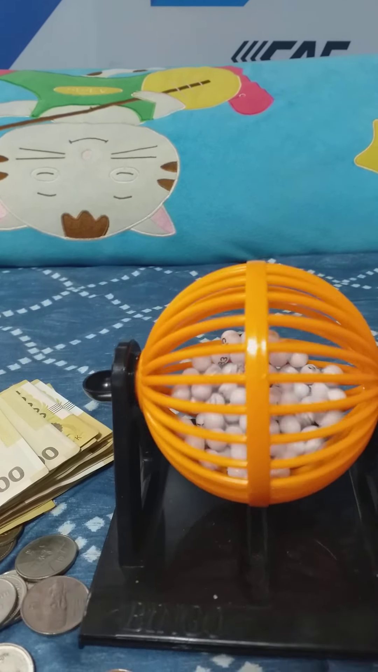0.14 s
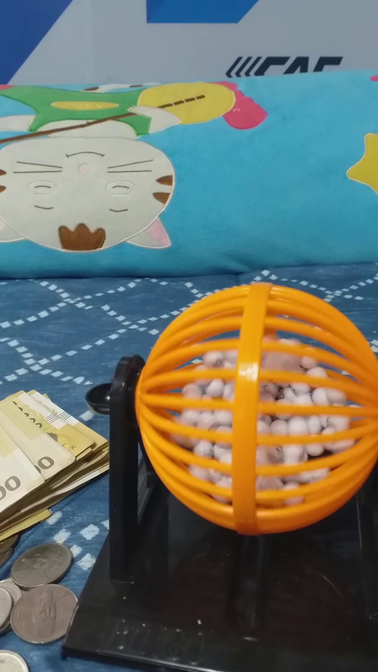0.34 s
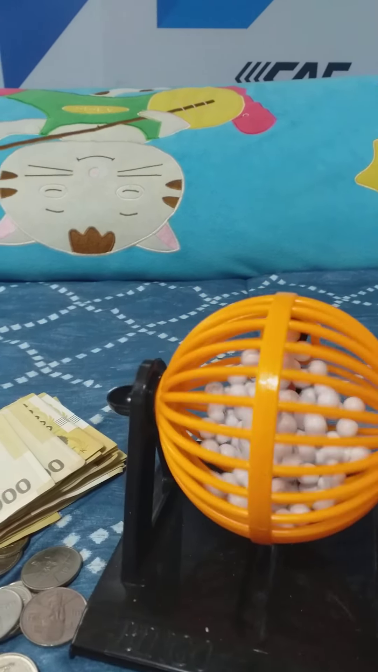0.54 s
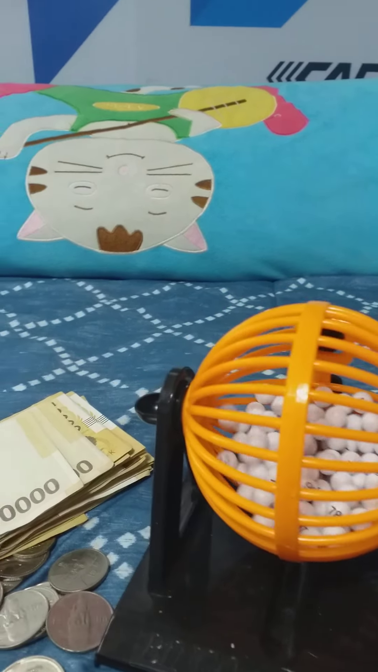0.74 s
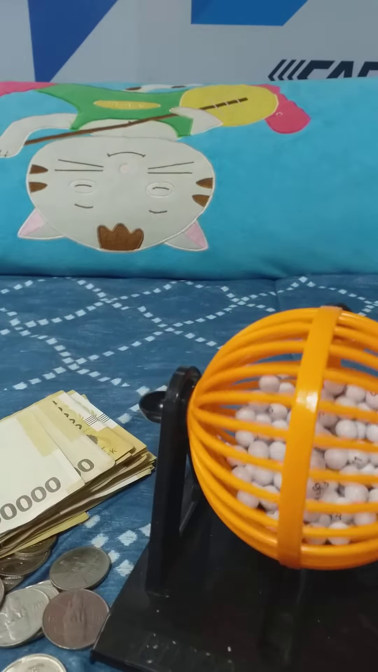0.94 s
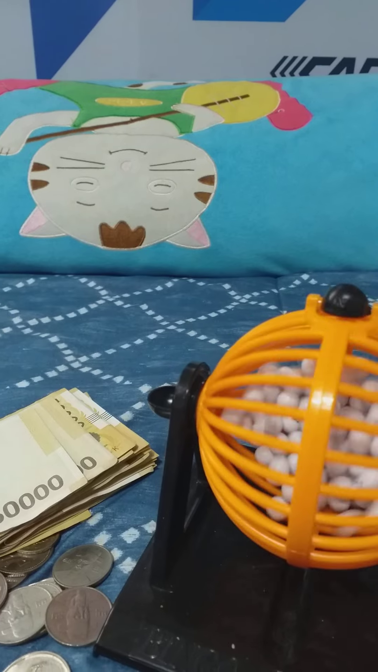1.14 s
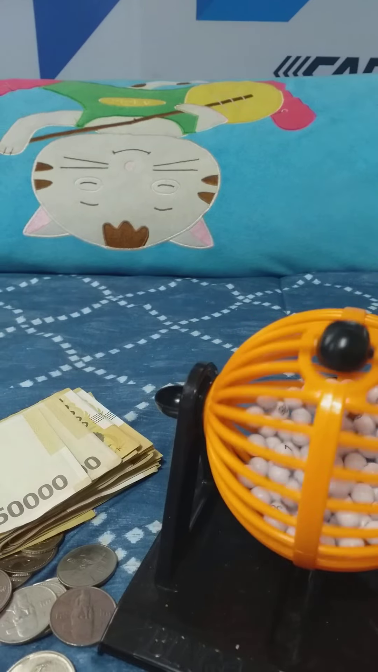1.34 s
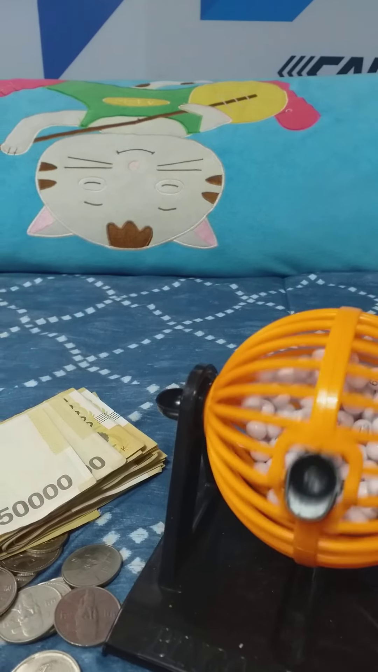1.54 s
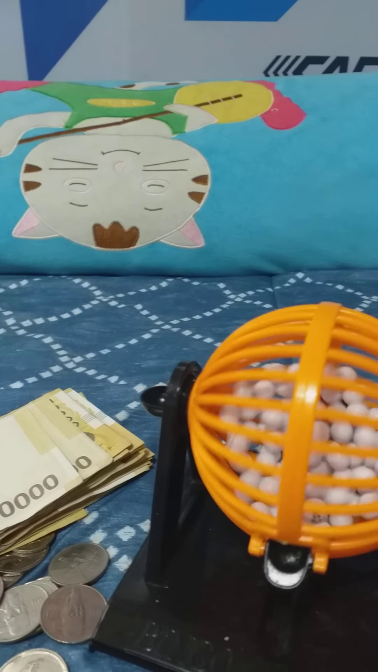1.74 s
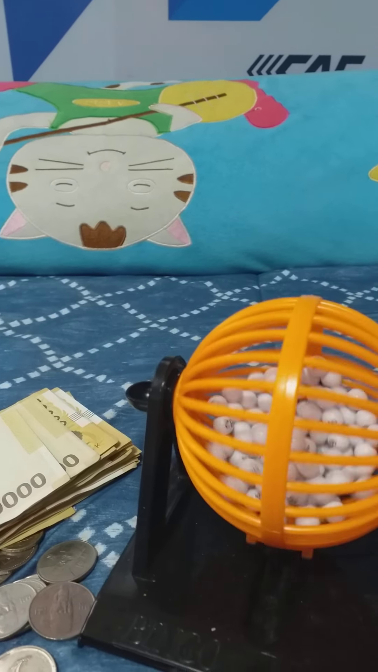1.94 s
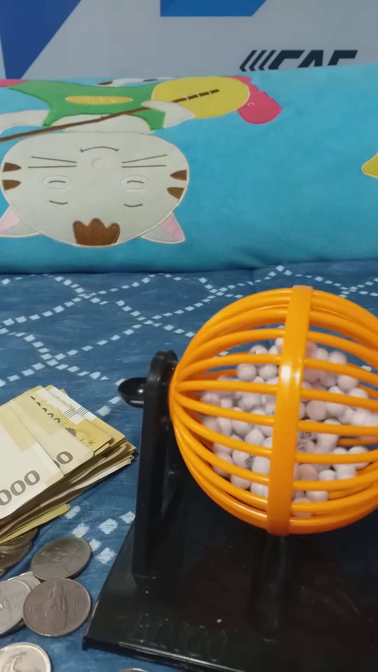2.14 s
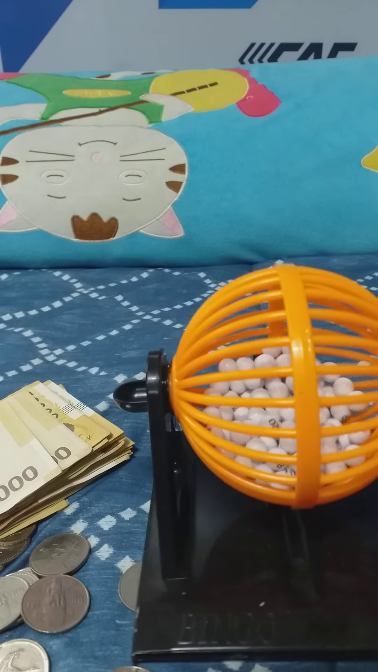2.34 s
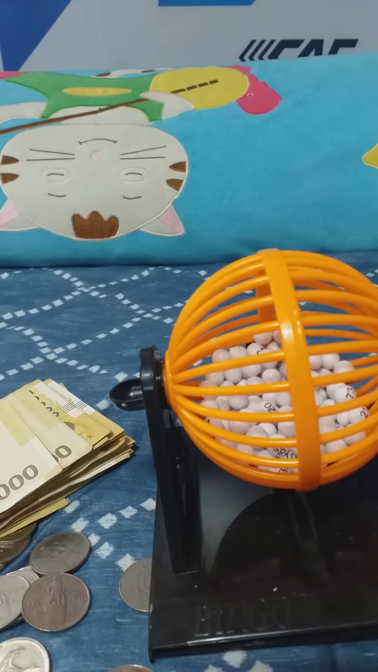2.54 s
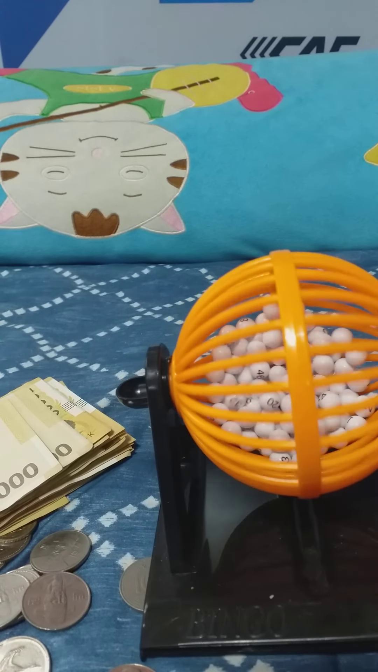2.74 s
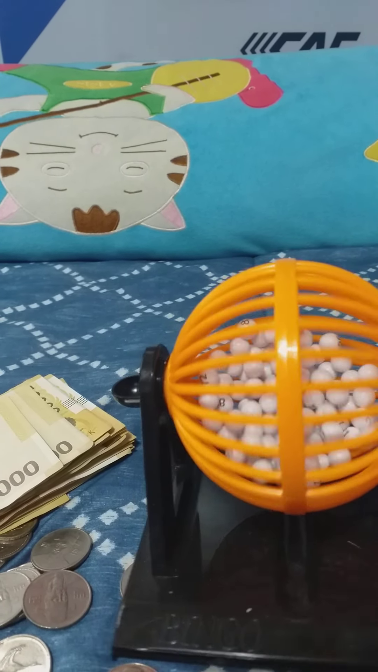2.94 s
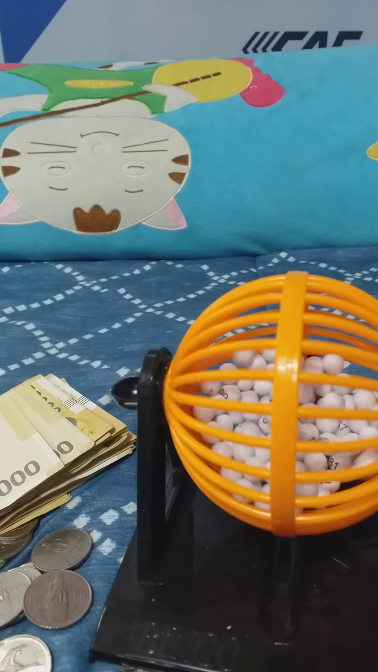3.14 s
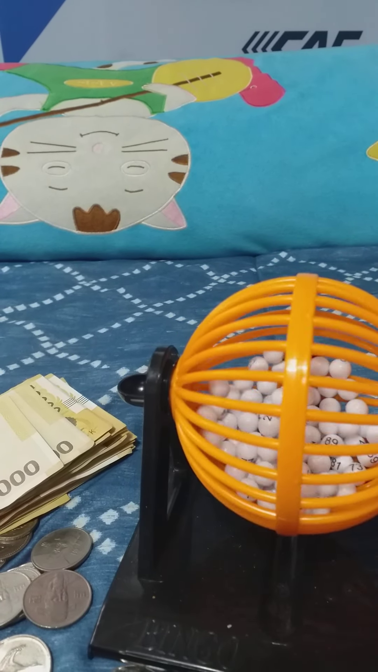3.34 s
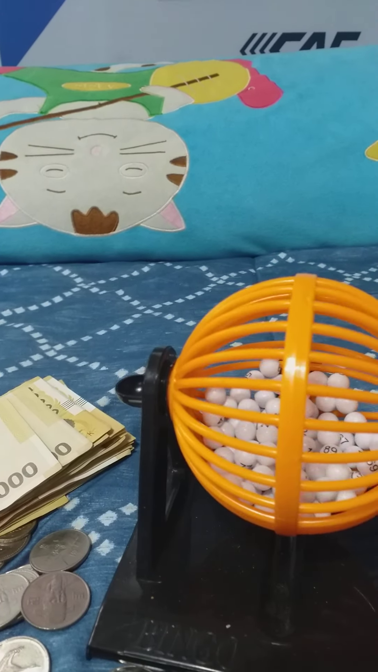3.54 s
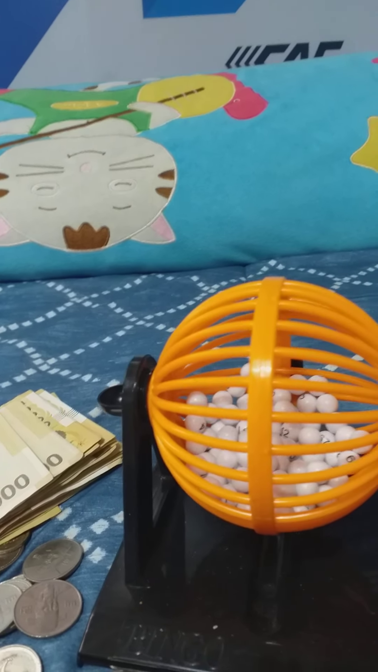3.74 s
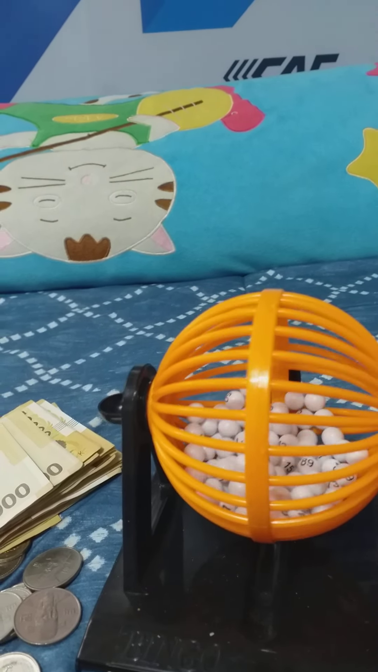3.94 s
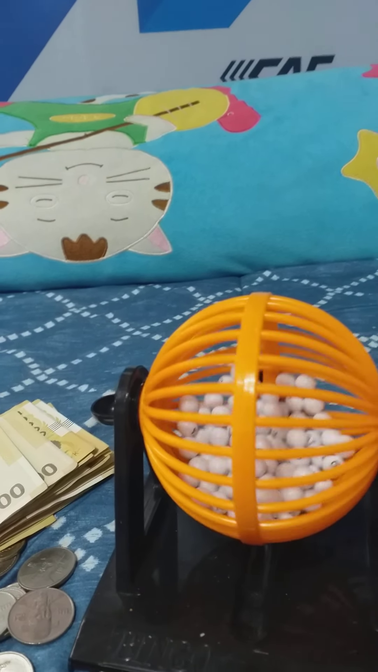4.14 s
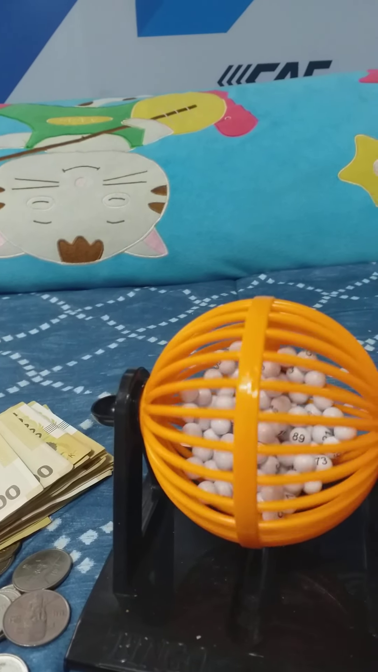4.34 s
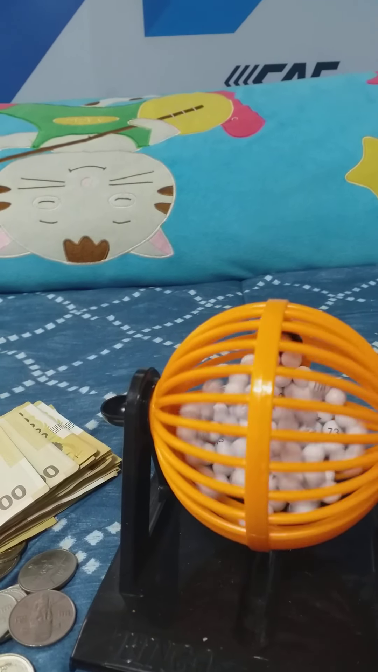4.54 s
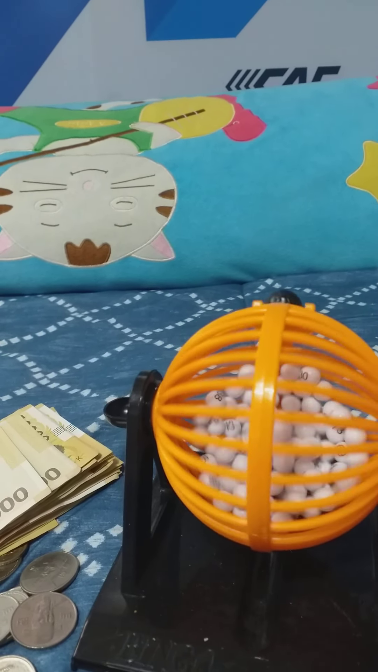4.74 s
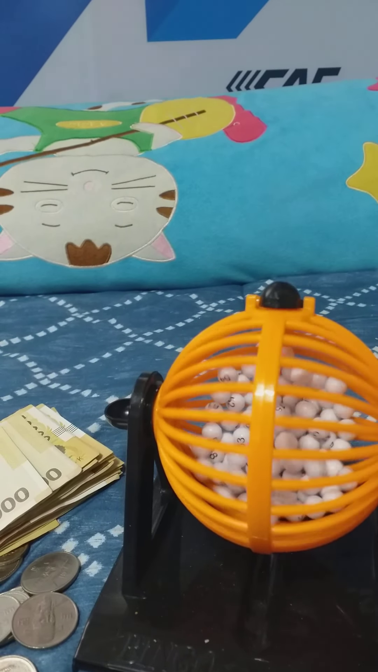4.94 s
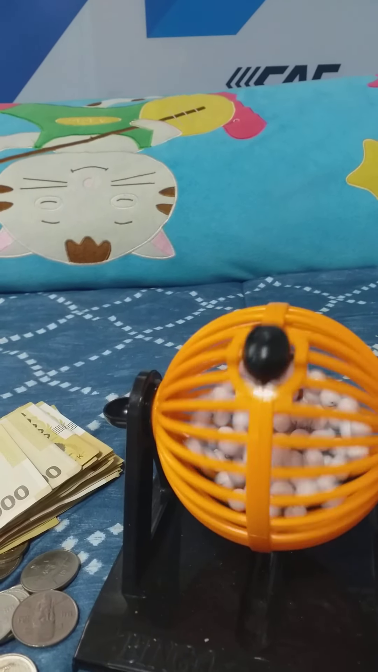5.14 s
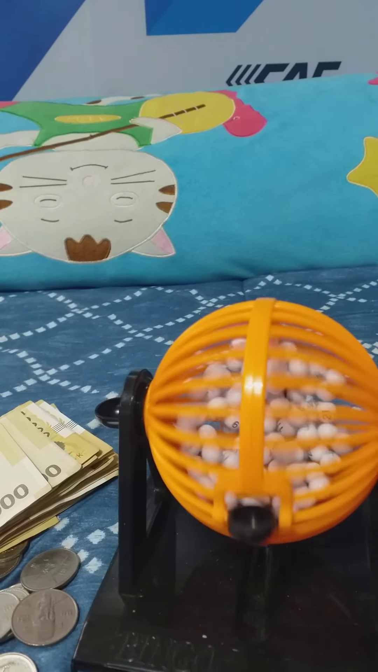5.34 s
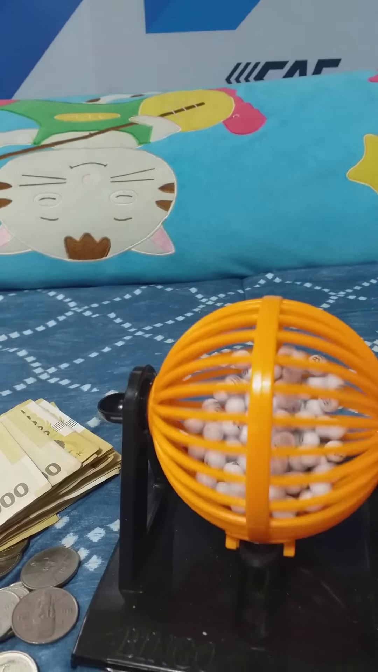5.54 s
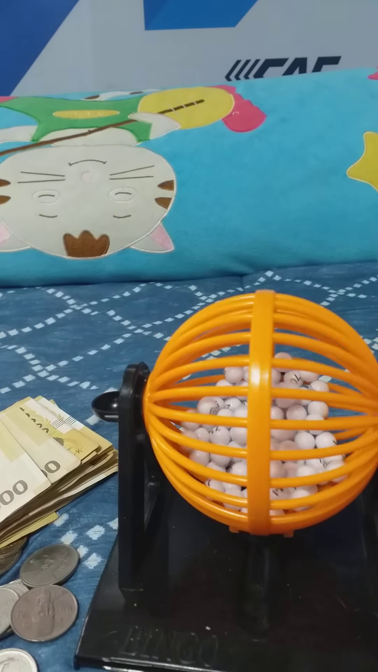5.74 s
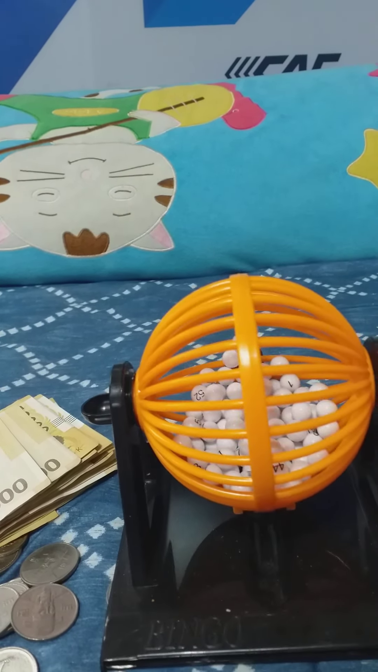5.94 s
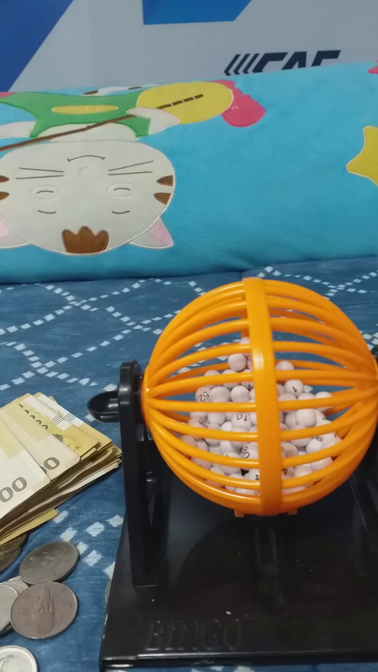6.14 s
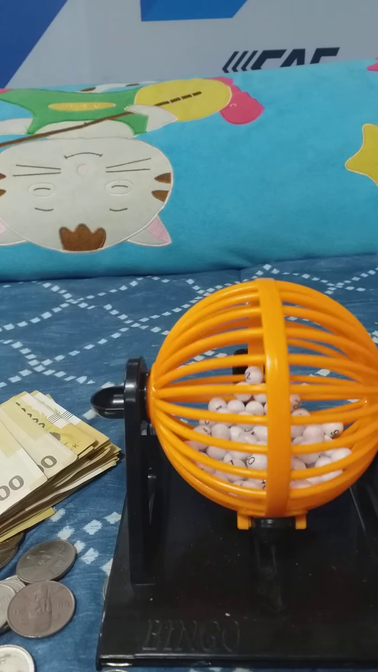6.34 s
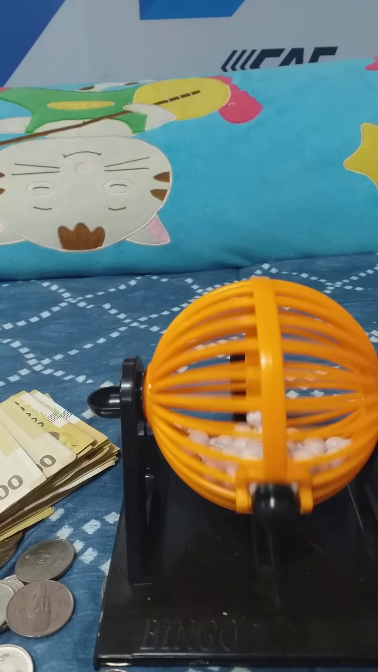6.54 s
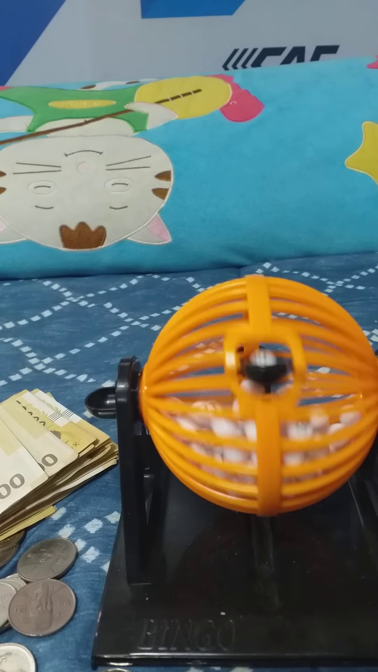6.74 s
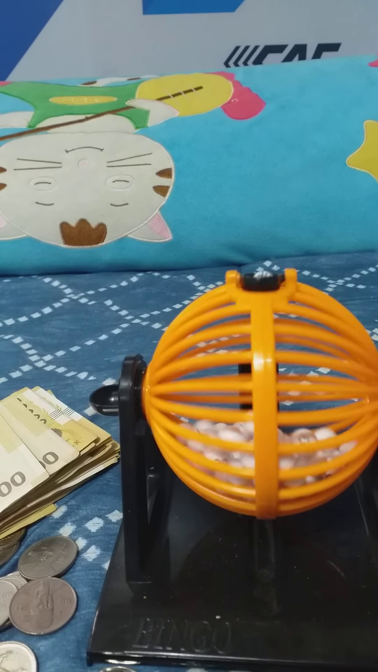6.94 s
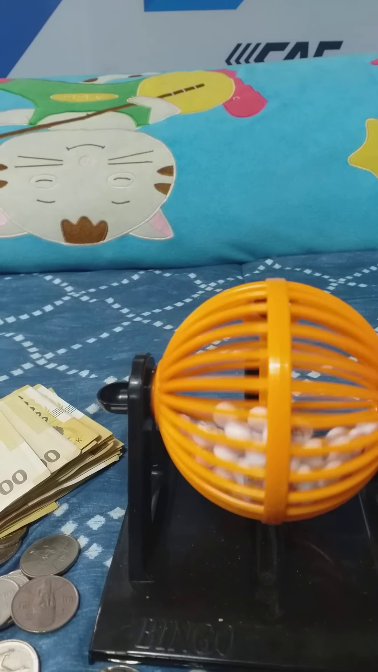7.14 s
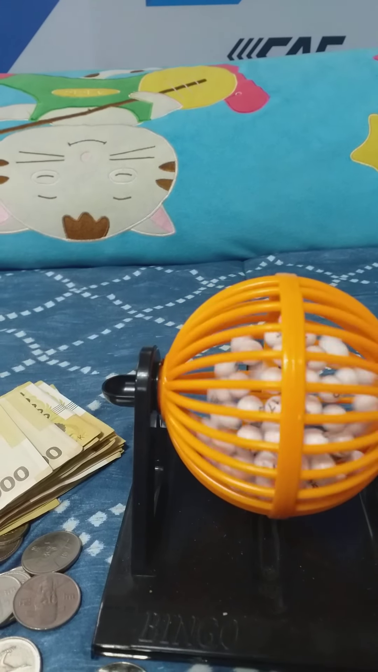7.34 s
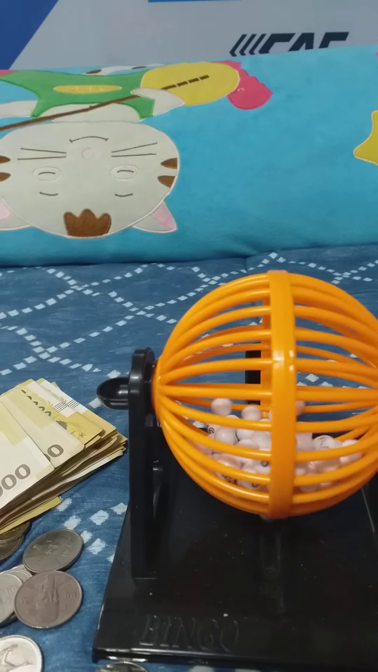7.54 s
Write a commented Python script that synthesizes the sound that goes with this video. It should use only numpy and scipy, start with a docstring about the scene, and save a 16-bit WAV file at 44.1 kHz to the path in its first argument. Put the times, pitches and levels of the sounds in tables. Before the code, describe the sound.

A small plastic cage full of little balls is cranked in fits, giving crisp dense clatter, stray clacks and short settling ticks over faint room hum.

```python
"""A quiet room: on a bed, close to the microphone, a toy bingo cage of small plastic balls is cranked in bursts.
The heap catches and slips; every collision is a noise crack with ringing ball modes, filtered by the cage ribs.
Single balls drop clear of the heap, also as the cage stops. The axle rubs and the frame bumps once.
A short dull room tail follows; shaped noise and sines make the room air and a faint hum."""
import sys
import numpy as np
from scipy import signal
from scipy.fft import rfft, irfft
from scipy.io import wavfile
from scipy.ndimage import uniform_filter1d

SR = 44100
rng = np.random.default_rng(int(sys.argv[2]) if len(sys.argv) > 2 else 0)


def wav_record(signal):
    """Record a signal, one row per channel, as 16-bit PCM in the file named by sys.argv[1]."""
    frames = np.transpose(np.atleast_2d(signal))
    bounded = np.clip(frames, -1, 1)
    # unit amplitude maps onto the largest positive 16-bit level
    quanta = np.round(bounded * 32767).astype(np.int16)
    wavfile.write(sys.argv[1], SR, quanta)


N = 334187
TIME = np.arange(N) / SR

# Single balls heard apart from the heap, from hard clacks to faint settling ticks.
# Each row: time in seconds, level in dB before the drop trim,
# cage and contact tick in dB relative to the ball, before their trims.
SINGLE_BALLS = [(0.0429, -17, -18, -21), (0.0873, -21, -16, -8), (0.1223, -10.5, -13, -13),
                (0.2204, -19.5, -7, -5), (0.2673, -16, -9.5, -7), (0.2846, -15.5, -8.5, -5),
                (0.3388, -18, -10, -11), (0.364, -13, -12, -10), (0.384, -15, -16, -12),
                (0.7008, -29, -11, -3), (0.753, -28, -4, -6), (0.7796, -22.5, -6.5, -7),
                (0.8047, -25.5, -2, -0.5), (0.831, -24, -2.5, 1), (0.8644, -27.5, -10, -8),
                (0.927, -35, -11, -13), (1.052, -18, -13, -16), (1.103, -26, -24, -10),
                (1.1267, -14.5, -12, -10), (1.463, -17.5, -5.5, -7), (1.546, -14.5, -10.5, -7),
                (2.0499, -14, -18, -7.5), (2.1863, -8.5, -16, -10.5), (2.33, -8.5, -17.5, -19),
                (2.3652, -22, -12, -13), (2.4173, -22.5, -16, -16), (2.4699, -29.5, -13, -22),
                (2.496, -30.5, -9.5, -9), (2.5396, -24, -14, -14), (2.5687, -38, -10, -18),
                (2.6004, -40, -13, -18), (2.6528, -39, -7, -21), (2.7314, -35, -10, -18),
                (2.8216, -14.5, -14, -11), (2.8423, -19.5, -12, -15), (2.9016, -15, -4.5, -9),
                (2.9347, -18, -12, -5), (2.958, -13, -14, -16), (3.0105, -11, -12.5, -14),
                (3.042, -11, -14, -16), (3.0583, -9, -14, -13), (3.166, -14.5, -16, -11),
                (3.1766, -13.5, -9, -9), (3.2077, -17.5, -9, -7), (3.253, -13.5, -13, -12),
                (3.3054, -24, -14, -9), (3.358, -28, -16, -8), (3.3738, -18, -13, -10.5),
                (3.411, -23.5, -13, -14), (3.4451, -29, -12, -12), (3.469, -29, -7, -8),
                (3.4947, -28, -12, -11), (3.5245, -36, -10.5, -15), (3.6, -51.5, -0.5, -16),
                (3.6342, -31.5, -17, -17), (4.1807, -36, -25, -33), (4.4182, -22, -14, -13),
                (4.4317, -13.5, -11.5, -7.5), (4.468, -16, -16, -7), (4.5663, -7, -6, -5.5),
                (4.6303, -5, -9, -14), (4.9006, -15, -22, -10.5), (4.9392, -10.5, -13, -13),
                (4.9868, -9, -32, -18), (5.8187, -24.5, -6, -5), (5.8781, -22, -7.5, -10),
                (5.898, -18.5, -13, -15), (5.9226, -25, -10, -12), (5.94, -35, -6, -19),
                (5.9983, -33.5, -9, -12), (6.0146, -29.5, -5, -8), (6.0451, -31, -10, -10),
                (6.0527, -31.5, -8.5, -14.5), (6.2721, -53, -18, -28.5), (6.4325, -45.5, -8.5, -16),
                (6.5578, -38.5, -10, -15), (6.5842, -35, -8, -8), (6.6503, -25.5, -8, -8),
                (6.667, -26, -10, -7), (6.7014, -22, -10, -3), (7.4574, -2.5, -13, -20)]


def undb(db):
    """Decibels to gain."""
    return 10 ** (np.asarray(db) / 20)


def unit(x):
    """Scale to energy one."""
    return x / np.sqrt(np.sum(x ** 2))


def band(x, lo_hz, hi_hz, order=4):
    """Causal band-pass."""
    sos = signal.butter(order, [lo_hz, min(hi_hz, SR / 2 - 1)], "band", fs=SR, output="sos")
    return signal.sosfilt(sos, x)


def colour(points, hz):
    """A (Hz, dB) spectrum read on a log-frequency axis."""
    point_hz, db = np.transpose(points)
    return np.interp(np.log(hz + 1), np.log(point_hz), db)


def fade(t60_s, size):
    """Exponential decay, 60 dB in t60_s."""
    return np.exp(-np.log(1000) * TIME[:size] / t60_s)


def burst(t60_s, size):
    """Decaying noise of energy one: many tiny reflections."""
    return unit(rng.standard_normal(size) * fade(t60_s, size))


def add(out, start, sound):
    """Mix a sound in from a given sample."""
    piece = out[max(start, 0):][:len(sound)]
    piece += sound[:len(piece)]


def swell(start_s, rise_s, hold_s, fall_db_per_s):
    """A smooth rise, a hold and an even fall; dB through time, 0 at the top."""
    risen = np.sin(np.pi / 2 * np.clip((TIME - start_s) / max(rise_s, .005), 0, 1)) ** 2
    falling_s = np.maximum(TIME - start_s - rise_s - hold_s, 0)
    return 20 * np.log10(risen + 1e-9) - np.minimum(fall_db_per_s * falling_s, 200)


def part_gains(db, cage_db, tick_db):
    """Gains of cage, ball and contact; cage and tick are relative to the ball."""
    return undb([db + cage_db, db, db + tick_db])


def heap(creep_db=-95, stop_db_per_s=604, slow_cage_db_per_db=0.1435, slow_tick_db_per_db=0.11):
    """Slides add in power, each until the heap locks; ball, relative cage and relative tick dB through time."""
    # Slides of the heap: loud ones as the crank is pushed, faint ones as the balls creep and settle.
    # Each row: start in seconds, rise in seconds, hold in seconds,
    # settling in dB per second, length until the heap locks in seconds, ball ring in dB,
    # cage and contact tick in dB relative to the ball at full speed.
    slides = [(-0.2, 0.4, 0.00063, 47, 0.55, -26, -4.5, -4), (0.288, 0.16, 0.19, 183, 0.52, -23.5, -2, 0.5),
              (0.696, 0.078, 0.073, 120, 0.17, -37, -1, -4), (0.864, 0.071, 0.12, 28, 0.25, -65.5, 9, 2),
              (1.025, 0.21, 0.022, 68, 0.7, -16.5, -5, -0.4),
              (1.457, 0.22, 0.073, 40, 1.08, -17.5, -4, -0.5),
              (2.082, 0.093, 0.12, 138, 0.3, -25.5, -6, -4.5), (2.407, 0.05, 0.029, 70, 0.28, -52.5, 2, -3),
              (2.705, 0.027, 0.032, 63.5, 0.13, -50.5, 0, -7.5),
              (2.77, 0.19, 0.22, 80, 0.84, -28.5, -3, -3), (4.332, 0.06, 0.03, 60, 0.13, -53, -0.5, -7.5),
              (4.395, 0.19, 0.061, 58, 0.5, -17, -4, -0.5), (4.765, 0.46, 0.34, 61.5, 1.17, -19, -3, -1),
              (5.917, 0.03, 0.079, 103, 0.35, -64, 5, -5), (6.51, 0.12, 0.08, 40, 0.21, -50, 1.5, -2),
              (6.636, 0.19, 0.026, 36.5, 0.7, -14.5, -4.5, -3),
              (7.062, 0.24, 0.072, 53, 0.41, -17, -3, -1.5), (7.35, 0.056, 0.046, 156, 0.3, -14, -6, -3.5)]
    power = undb(creep_db) ** 2  # the faintest stir
    for start_s, rise_s, hold_s, fall_db_per_s, length_s, db, cage_db, tick_db in slides:
        speed_db = swell(start_s, rise_s, hold_s, fall_db_per_s)
        locked_db = -np.clip(stop_db_per_s * (TIME - start_s - length_s), 0, 200)
        # a slow slide gives more rib and less tick
        slow_cage_db = cage_db - slow_cage_db_per_db * speed_db
        slow_tick_db = tick_db + slow_tick_db_per_db * speed_db
        power = power + part_gains(db + speed_db + locked_db, slow_cage_db, slow_tick_db) ** 2
    cage_db, ball_db, tick_db = 10 * np.log10(power)
    return np.array([ball_db, cage_db - ball_db, tick_db - ball_db])


def catching(catches_per_s=55, catch_db=2.0, surges_per_s=12, surge_db=0.61):
    """The heap never flows evenly: it moves in small clusters and wider surges; dB through time."""
    def wander(points_per_s):
        """Straight lines between random levels."""
        return np.interp(TIME * points_per_s, np.arange(2048), rng.standard_normal(2048))
    return catch_db * wander(catches_per_s) + surge_db * wander(surges_per_s)


def stalls(falls, stall_db=-4.0, stall_s=0.022):
    """The heap catches for a moment before each ball breaks loose; dB through time."""
    depth = np.zeros(N)
    ramp = np.linspace(0, 1, int(stall_s * SR)) ** .5
    for fall_s, *_ in falls:
        add(depth, int(fall_s * SR) - len(ramp), ramp)
    return stall_db * np.minimum(depth, 1)


def cage_response(liveliness=1.164, size=8192):
    """Causal, minimum-phase ring of the filled cage, shared by all collisions."""
    # Broad colour of plastic on plastic. Each row: frequency in Hz, level in dB.
    plastic = [(40, -61), (170, -27), (300, -15), (420, -22.5), (650, -16.5), (1000, -5.5), (1400, -3.5),
               (1800, -5), (2750, -6), (4800, -3), (5700, 6), (7200, 10), (8900, -7), (11500, -2),
               (15500, 4)]
    # Ribs and packed heap. Each row: frequency in Hz, width in Hz, lift in dB before liveliness.
    resonances = [(1572, 50, 9), (1655, 50, 3.5), (2080, 90, 6.5), (2285, 110, 8.5), (2390, 80, 9),
                  (2475, 90, 10), (3120, 90, 5), (3560, 200, 3.5), (3695, 60, 4.5), (4190, 100, 6),
                  (4370, 200, 3.5), (4530, 60, 3), (5250, 120, 2), (6105, 70, 4), (6230, 80, 6),
                  (6615, 70, 5), (6735, 130, 6), (7120, 200, 3), (7550, 110, 5), (8030, 110, 4),
                  (9910, 350, 7), (10890, 110, 4), (13230, 400, 3), (14590, 80, 4), (15620, 250, 3)]
    hz = np.arange(size // 2 + 1) * SR / size
    lift_db = sum(lift / (1 + (2 * (hz - f) / width) ** 2) for f, width, lift in resonances)
    db = colour(plastic, hz) + liveliness * lift_db
    # folding the cepstrum puts the energy as early as possible
    cepstrum = irfft(np.log(undb(db)))
    cepstrum[1:size // 2] *= 2
    cepstrum[size // 2 + 1:] = 0
    return irfft(np.exp(rfft(cepstrum)))[:size // 2]


def collision(cage, crack_t60_s, jostle_t60_s, jostle_db, ball_spread,
              build_s=0.012, press_s=0.00021, echo_db=-9, size=3072):
    """One contact: crack, jostle of the neighbours and the ball's modes; a unit waveform for each part."""
    # Modes of one ball. Each row: frequency in Hz before the spread, t60 in seconds, level in dB.
    ball_modes = [(6477, 0.026, -2.5), (9980, 0.0094, -7), (12400, 0.015, -22.5)]
    # Bands of cage, ball and contact. Each row: low edge in Hz, high edge in Hz.
    parts = [(60, 4500), (4500, 9000), (9000, 19000)]
    time = TIME[:size]
    # the blow takes a moment to spread through the neighbouring balls
    jostle = burst(jostle_t60_s, size) * (1 - np.exp(-time / build_s))
    # and loses its brightest edge on the way
    jostle = unit(band(jostle, 100, 9000, order=2))
    contact = burst(crack_t60_s, size) + undb(jostle_db) * jostle
    pitch = 1 + ball_spread * rng.standard_normal()  # no two balls are quite alike
    for hz, t60_s, db in ball_modes:
        mode = np.sin(2 * np.pi * hz * pitch * time) * fade(t60_s, size)
        contact = contact + undb(db) * unit(mode)
    contact = contact * (1 - np.exp(-time / press_s))  # plastic gives a little
    # each place in the cage has its own reflections from the stand and wall
    contact = contact + undb(echo_db) * burst(.07, size)
    ring = signal.fftconvolve(contact, cage)[:size]
    return np.array([unit(band(ring, lo_hz, hi_hz)) for lo_hz, hi_hz in parts])


def tumble(contacts, motion, falls, slow_per_s=178.5, full_per_s=1300, full_db=-16, rate_db_per_e=16,
           scatter_db=3.5, tick_scatter_db=3):
    """Random collisions; the faster the heap slides, the denser and louder they come."""
    db, cage_db, tick_db = motion
    rate_per_s = slow_per_s + full_per_s * np.exp((db - full_db) / rate_db_per_e)
    blows = (rng.random(N) < rate_per_s / SR) * undb(scatter_db * rng.standard_normal(N))
    # the collisions of each moment share the energy that the crank feeds in
    power = uniform_filter1d(uniform_filter1d(blows ** 2, size=800), size=400)
    blows = blows / np.sqrt(np.abs(power) + 1e-9)
    which = rng.integers(len(contacts), size=N)
    # head-on blows tick harder than glancing ones
    hardness_db = tick_scatter_db * rng.standard_normal(N)
    gains = part_gains(db + stalls(falls) + catching(), cage_db, tick_db + hardness_db)
    out = np.zeros(N)
    for i in np.flatnonzero(blows):
        add(out, i, blows[i] * gains[:, i] @ contacts[which[i]])
    return out


def slips(motion, slips_per_s=20, slip_db=19.5, slip_scatter_db=0.2, cage_db=-3, tick_db=3.0,
          colour_scatter_db=1.5, caught_s=0.035, fast_db=-18, slow_slip_db_per_db=0.353):
    """Balls that break loose at random, levels following the heap; rows like SINGLE_BALLS, without trims."""
    chance = rng.standard_normal((256, 3))
    times_s = np.cumsum(rng.gamma(3, 1 / 3, 256)) / slips_per_s
    # nothing slips while the heap is caught before one of the single balls
    lead_s = np.transpose(SINGLE_BALLS)[0] - times_s[:, None]
    free = (times_s < TIME[-1]) & ~np.any((lead_s > 0) & (lead_s < caught_s), axis=1)
    times_s, chance = times_s[free], chance[free]
    heap_levels = motion[:, (times_s * SR).astype(int)].T
    spread_db = np.array([slip_scatter_db, colour_scatter_db, colour_scatter_db])
    levels = heap_levels + [slip_db, cage_db, tick_db] + spread_db * chance
    # the slower the heap, the more these balls stand out
    levels[:, 0] += slow_slip_db_per_db * np.clip(fast_db - heap_levels[:, 0], 0, 20)
    return np.column_stack([times_s, levels])


def drops(contacts, falls, drop_trim_db=0, cage_trim_db=0, tick_trim_db=0):
    """Balls that fall clear of the heap and land on it or on the ribs."""
    out = np.zeros(N)
    for k, (fall_s, db, cage_db, tick_db) in enumerate(falls):
        gains = part_gains(db + drop_trim_db, cage_db + cage_trim_db, tick_db + tick_trim_db)
        add(out, int(fall_s * SR), gains @ contacts[k % len(contacts)])
    return out


def crank(cage, thud_hz=330, thud_t60_s=0.02, grain_db=4, cage_share_db=-3):
    """Dry friction in the axle as grainy band noise; one dull bump of the frame as a decaying sine."""
    # The axle rubs as the hand shifts on the crank. Each row: start in seconds, rise in seconds,
    # hold in seconds, fading in dB per second, level in dB rms at the top, low edge in Hz, high edge in Hz.
    rubs = [(3.965, 0.054, 0.04, 131, -63, 2500, 9100), (4.0, 0.08, 0.18, 50.5, -73, 1690, 2560),
            (6.414, 0.095, 0.11, 91, -54.5, 448, 5440), (6.42, 0.067, 0.09, 90, -63, 11000, 16060)]
    grip_s, grip_db = 6.417, -36.5  # the hand takes hold of the crank
    out = np.zeros(N)
    for start_s, rise_s, hold_s, fall_db_per_s, db, low_hz, high_hz in rubs:
        grains = rng.standard_normal(N) * undb(grain_db * rng.standard_normal(N))
        rub = band(grains, low_hz, high_hz, order=2)
        ribs = signal.fftconvolve(rub, cage)[:N]  # it also stirs the ribs
        rub = unit(rub) + undb(cage_share_db) * unit(ribs)
        out += unit(rub) * np.sqrt(N) * undb(db + swell(start_s, rise_s, hold_s, fall_db_per_s))
    thud = np.sin(2 * np.pi * thud_hz * TIME) * fade(thud_t60_s, N)
    add(out, int(grip_s * SR), undb(grip_db) * thud)
    return out


def room(x, t60_s=0.16, wet_db=-21, size=16384):
    """A short dull tail, 5 ms late, damped by bedding."""
    tail = undb(wet_db) * unit(band(burst(t60_s, size), 280, 2300, order=1))
    return x + signal.fftconvolve(x, np.r_[np.zeros(SR // 200), tail])[:N]


def background():
    """Low room air as shaped noise and a steady appliance hum as sines."""
    # Colour of the room air. Each row: frequency in Hz, relative density in dB.
    air_colour = [(20, -43), (45, -22.5), (70, -16.5), (115, -12), (160, -17), (400, -19.5), (640, -20),
                  (880, -30.5), (1700, -40.5), (3500, -48.5), (6000, -42.5), (7400, -39.5), (8300, -51),
                  (15500, -48.5)]
    # Level of the room air. Each row: time in seconds, level in dB rms.
    air_level = [(0, -56), (2.5, -58.5), (3.1, -56), (5.6, -57.5), (6.2, -59.5), (7.58, -56.5)]
    # Appliance hum. Each row: frequency in Hz, level in dB rms.
    hum_lines = [(78, -66), (103, -66.5), (120, -63.5), (452, -78), (641, -69.5)]
    hz = np.arange(N // 2 + 1) * SR / N
    air = irfft(rfft(rng.standard_normal(N)) * undb(colour(air_colour, hz)), N)
    air = unit(air) * np.sqrt(N) * undb(np.interp(TIME, *np.transpose(air_level)))
    hum = np.zeros(N)
    for line_hz, db in hum_lines:
        hum += np.sqrt(2) * undb(db) * np.sin(2 * np.pi * (line_hz * TIME + rng.random()))
    return air + hum


def scene(count=128):
    """The cage in its room."""
    cage = cage_response()
    crowded = [collision(cage, crack_t60_s=.004, jostle_t60_s=.025, jostle_db=3.5, ball_spread=.05)
               for _ in range(count)]
    clear = [collision(cage, crack_t60_s=.006, jostle_t60_s=.024, jostle_db=1, ball_spread=.03)
             for _ in range(count)]
    motion = heap()
    loose = slips(motion)
    balls = tumble(crowded, motion, [*SINGLE_BALLS, *loose])
    balls = balls + drops(clear[::-1], loose)
    balls = balls + drops(clear, SINGLE_BALLS, drop_trim_db=16.0, cage_trim_db=7.5, tick_trim_db=10.5)
    return (room(balls + crank(cage)) + background())[None]


def record(dry, ceiling=.78, top_hz=15750):
    """The recorder rounds the tallest peaks, then cuts the deep bass and the top."""
    rounded = band(ceiling * np.tanh(dry / ceiling), 36, 20000, order=4)
    return signal.sosfilt(signal.ellip(12, .2, 80, top_hz, fs=SR, output="sos"), rounded)


dry = scene()
out = record(dry)
wav_record(out)
```